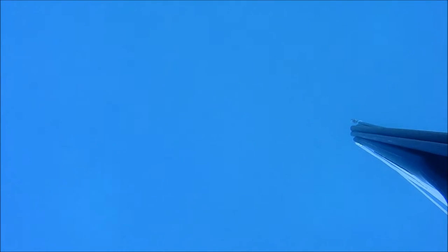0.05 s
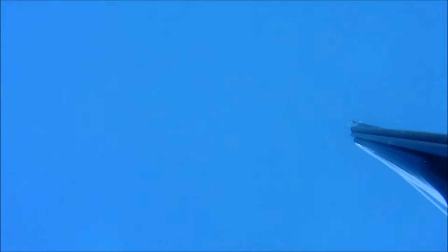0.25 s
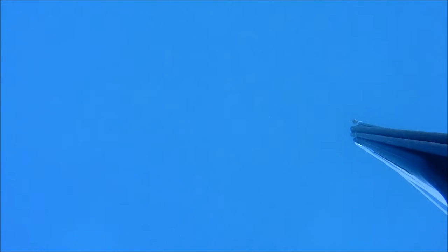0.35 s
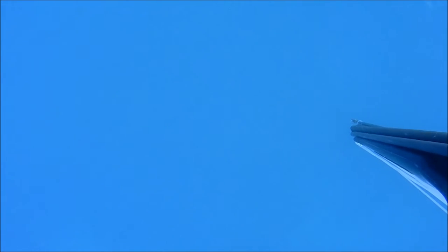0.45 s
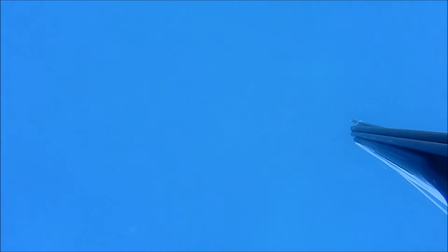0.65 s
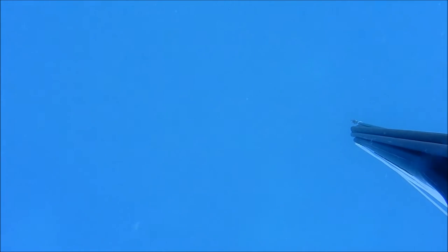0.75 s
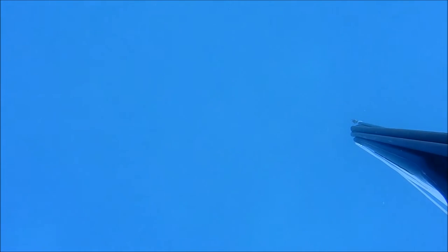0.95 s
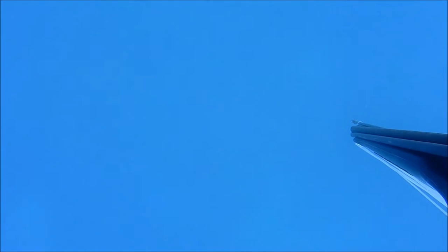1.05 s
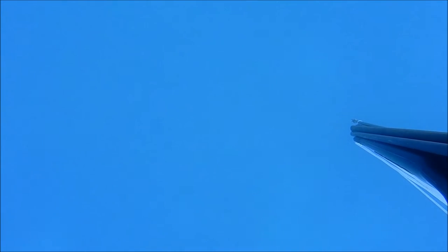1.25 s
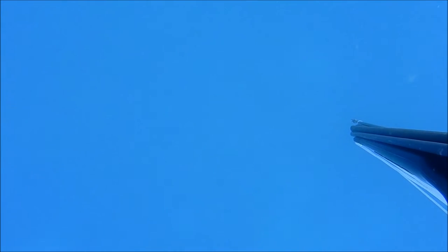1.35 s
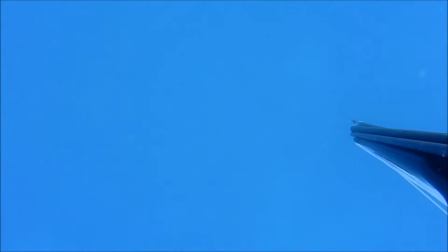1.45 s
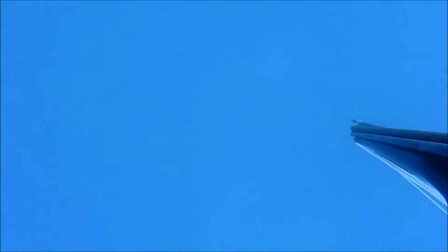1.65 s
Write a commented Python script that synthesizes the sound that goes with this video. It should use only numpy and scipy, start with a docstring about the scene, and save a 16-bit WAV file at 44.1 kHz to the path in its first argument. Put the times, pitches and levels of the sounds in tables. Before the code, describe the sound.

Fishing gear knocks hard against an underwater rig at about 0.25 seconds, very close and briefly overloading the microphone. It rubs along, bumps again more softly around 0.4 seconds and settles by 0.5. A low rumble of passing water swells with the knock and calms by 0.6 seconds. Small, sharp shrimp-like snaps crackle irregularly over a faint sea hiss until the end, at about 1.7 seconds.

```python
"""Under open sea water, a piece of fishing gear knocks hard against a rig and overloads the microphone
that the rig carries. The gear rubs along, bumps again more softly and settles; impact and friction
excite the same normal modes. Water pushing past the housing rumbles and calms down, and small sharp
snaps, probably shrimp, crackle over a faint hiss, coloured by the resonances of the housing."""
import sys
import numpy as np
from scipy import signal
from scipy.fft import rfft, irfft
from scipy.io import wavfile
from scipy.ndimage import uniform_filter1d

SR = 44100
rng = np.random.default_rng(int(sys.argv[2]) if len(sys.argv) > 2 else 0)


def waveform_to_disk(signal):
    """Save audio, clipped to [-1, 1], as 16-bit WAV at the path in sys.argv[1]."""
    frames = np.transpose(np.atleast_2d(signal))
    scaled = np.clip(frames, -1, 1) * 32767
    samples = np.round(scaled).astype(np.int16)
    wavfile.write(sys.argv[1], SR, samples)


N = 74970
TIME = np.arange(N) / SR

# Strength of the flow past the housing. Each row: time in seconds, rumble level in dB.
FLOW_LEVELS = [(0, -35.5), (0.12, -32), (0.3, -24.5), (0.45, -28.5), (0.58, -43), (0.9, -39.5), (1.2, -48),
               (1.45, -41.5), (1.7, -46)]
# Spectra of the rumble and the sea hiss. Each row: frequency in Hz, relative spectral density in dB.
RUMBLE_SPECTRUM = [(8, -19), (14, 5.5), (26, -3), (40, -8.5), (55, -12), (80, -32), (160, -30), (400, -37),
                   (2000, -100)]
HISS_SPECTRUM = [(60, 0), (120, 1), (240, 2.5), (350, -2), (550, -3.5), (800, -7), (1200, -11), (1950, -16),
                 (2330, -10.5), (2750, -19.5), (5300, -20.5), (6300, -26.5), (10000, -28), (15500, -36.5)]
# Friction of the gear along the rig. Each row: time in seconds, rubbing level in dB.
RUB_LEVELS = [(0.0, -53), (0.23, -61), (0.255, -22.5), (0.29, -30), (0.325, -34), (0.36, -25),
              (0.395, -17.5), (0.43, -43), (0.48, -71), (1.7, -85)]
# Normal modes of the rig, then, from about 1.27 kHz up, the short modes of the gear itself. Each row: frequency
# in Hz, gain in dB, 60 dB decay time in seconds.
NORMAL_MODES = [(133.5, -18, 0.11), (236.7, -11, 0.064), (476.7, -6.5, 0.064), (519.3, -3.5, 0.096),
                (589.7, -10, 0.05), (681.5, 0.5, 0.084), (761.5, -10.5, 0.068), (989, -16, 0.049),
                (1268.6, -9.5, 0.025), (1731, -9.5, 0.019), (2030, -21.5, 0.016), (2332, -12.5, 0.057)]
# Blows of the gear on the rig. Each row: start in seconds, impulse in dB, contact corner frequency in Hz.
BLOWS = [(0.017, -36.5, 900), (0.1443, -23.5, 700), (0.188, -32, 600), (0.2418, -1.5, 5000),
         (0.2447, 5.5, 1300), (0.2612, -3, 700), (0.3045, -25, 3500), (0.354, -27, 600), (0.3795, -6, 550),
         (0.394, -8, 600), (0.4105, -21.5, 600), (0.469, -36.5, 600), (0.608, -41.5, 800),
         (0.734, -38.5, 800), (0.766, -41.5, 600), (0.889, -37, 550), (1.237, -43, 900)]
# Nearby snaps in the water. Each row: start in seconds, level in dB ahead of the housing.
NEAR_SNAPS = [(0.0402, -35.5), (0.2841, -37.5), (0.304, -52), (0.381, -38), (0.5234, -31.5), (0.5914, -38),
              (0.6011, -34), (0.7041, -32.5), (0.7132, -42.5), (0.7617, -44), (0.7754, -31.5),
              (0.8172, -37.5), (0.984, -37), (1.0687, -40), (1.0904, -38), (1.1643, -43), (1.1871, -29),
              (1.3438, -37.5), (1.42, -35.5), (1.4486, -42.5), (1.504, -41), (1.5232, -43), (1.6013, -39.5),
              (1.6438, -34.5), (1.6678, -43)]
# Resonances of the housing. Each row: centre frequency in Hz, bandwidth in Hz, relative gain in dB.
HOUSING_RESONANCES = [(1743, 240, 1), (2295, 93, 8), (3070, 380, -1.5), (3730, 213, 1), (4640, 390, -2.5),
                      (5590, 250, -3), (6870, 740, -12.5), (10100, 1400, -14.5), (14000, 1900, -24)]

HISS_DB, HISS_WAVER_DB = -51, 2.5
SLIPS_PER_S, SLIP_CORNER_HZ = 900, 810
FORCE_SPREAD_DB = 2.37   # from mode to mode and blow to blow
SNAP_T60_S, SNAP_TAIL_DB, SNAP_TAIL_T60_S = 0.011, -32, .04
FAR_SNAPS_PER_S, FAR_FLOOR_DB, FAR_SPREAD_DB = 100, -59, 5.5


def from_db(db):
    """Amplitude grows tenfold for every 20 dB."""
    return 10 ** (np.asarray(db) / 20)


def unit_rms(x):
    """Division by the root mean square gives unit power."""
    return x / np.sqrt(np.mean(x ** 2) + 1e-20)


def envelope(points):
    """Gain changes exponentially between (seconds, dB) points."""
    return from_db(np.interp(TIME, *np.transpose(points)))


def coloured_noise(spectrum):
    """Spectral shaping gives white noise a (Hz, dB) contour, at unit power."""
    hz, db = np.transpose(spectrum)
    bin_hz = np.maximum(np.arange(N // 2 + 1) * SR / N, 1)
    gains = from_db(np.interp(np.log(bin_hz), np.log(hz), db))
    return unit_rms(irfft(rfft(rng.standard_normal(N)) * gains, N))


def low_pass(x, hz):
    """Two first-order lags in series smooth away changes faster than the corner frequency."""
    pole = np.exp(-2 * np.pi * hz / SR)
    return signal.lfilter([(1 - pole) ** 2], [1, -2 * pole, pole * pole], x + 1e-18)


def water():
    """Flow noise: water pushing past the housing rumbles, over the wavering ambient hiss of the sea."""
    rumble = coloured_noise(RUMBLE_SPECTRUM)
    running_power = uniform_filter1d(rumble ** 2, int(.08 * SR))
    even_rumble = rumble / np.sqrt(running_power)   # so that the flow alone sets the swells
    waver = unit_rms(low_pass(rng.standard_normal(N), hz=4.9))
    hiss = from_db(HISS_DB + HISS_WAVER_DB * waver) * coloured_noise(HISS_SPECTRUM)
    return envelope(FLOW_LEVELS) * even_rumble + hiss


def decay_per_sample(t60):
    """Exponential decay: this factor, applied each sample, loses 60 dB in t60 seconds."""
    return np.exp(-np.log(1000) / (t60 * SR))


def ring(force, hz, t60):
    """A damped harmonic oscillator answers each impulse with a decaying sine."""
    radius, angle = decay_per_sample(t60), 2 * np.pi * hz / SR
    return signal.lfilter([0, np.sin(angle)], [1, -2 * radius * np.cos(angle), radius ** 2], force + 1e-18)


def rig_and_gear(forces):
    """Modal superposition, one force per mode; modes from the strongest upward oppose those below."""
    strongest_hz = max(NORMAL_MODES, key=lambda mode: mode[1])[0]
    return sum(from_db(db) * ring(force, hz, t60) * (1 if hz < strongest_hz else -1)
               for force, (hz, db, t60) in zip(forces, NORMAL_MODES))


def rubbing():
    """Stick-slip friction: dense little random slips drive all the modes of rig and gear."""
    slips = (rng.random(N) < SLIPS_PER_S / SR) * rng.standard_normal(N)
    friction = low_pass(slips, SLIP_CORNER_HZ)
    return envelope(RUB_LEVELS) * unit_rms(rig_and_gear([friction] * len(NORMAL_MODES)))


def knocks():
    """Impact excitation: the harder the contact, the shorter the push and the brighter the ringing."""
    pushes = np.array([from_db(db) * low_pass(signal.unit_impulse(N, int(start * SR)), corner_hz)
                       for start, db, corner_hz in BLOWS])
    mode_shares = from_db(FORCE_SPREAD_DB * rng.standard_normal((len(BLOWS), len(NORMAL_MODES))))
    return rig_and_gear(mode_shares.T @ pushes)


def snaps():
    """Impulsive sources, near and far: each is a brief noise burst with a faint tail from scattering."""
    far_sizes = from_db(FAR_FLOOR_DB + FAR_SPREAD_DB * np.minimum(rng.exponential(1, N), 3))
    impulses = far_sizes * (rng.random(N) < FAR_SNAPS_PER_S / SR)
    for start, db in NEAR_SNAPS:
        impulses[int(start * SR)] += from_db(db)
    # incoherent bursts and tails add in power
    power = sum(signal.lfilter([gain ** 2], [1, -decay_per_sample(t60) ** 2], impulses ** 2 + 1e-18)
                for gain, t60 in ((1, SNAP_T60_S), (from_db(SNAP_TAIL_DB), SNAP_TAIL_T60_S)))
    return np.sqrt(power) * rng.choice([-1, 1], N)


def resonance(x, hz, width_hz):
    """A second-order resonator passes a band, with unit gain at its peak."""
    radius, angle = np.exp(-np.pi * width_hz / SR), 2 * np.pi * hz / SR
    gain = (1 - radius ** 2) / 2
    return signal.lfilter([gain, 0, -gain], [1, -2 * radius * np.cos(angle), radius ** 2], x + 1e-18)


def housing(pressure):
    """Forced vibration: the housing passes sound through parallel resonances of alternating polarity."""
    return 2 * sum((-1) ** k * from_db(db) * resonance(pressure, hz, width_hz)
                   for k, (hz, width_hz, db) in enumerate(HOUSING_RESONANCES))


def scene():
    """Linear superposition: all the sounds add at one microphone inside the housing."""
    return (knocks() + rubbing() + housing(snaps()) + water())[None]


def record(dry):
    """Saturation: the overloaded microphone flattens the loud knock; a low-pass cuts the top treble."""
    ceiling, knee_sharpness, cutoff_hz = 0.49, 11.5, 16000
    clipped = dry / (1 + np.abs(dry / ceiling) ** knee_sharpness) ** (1 / knee_sharpness)
    return signal.sosfilt(signal.ellip(10, .1, 80, cutoff_hz, fs=SR, output="sos"), clipped)


dry = scene()
out = record(dry)
waveform_to_disk(out)
```